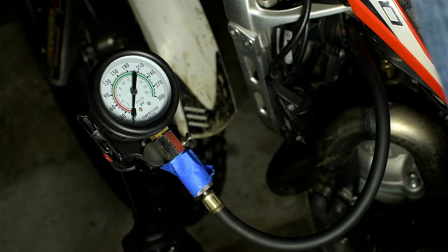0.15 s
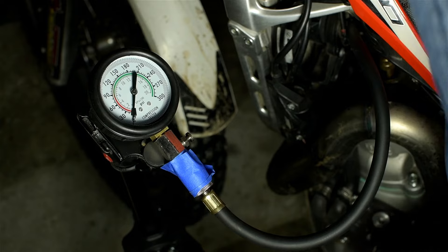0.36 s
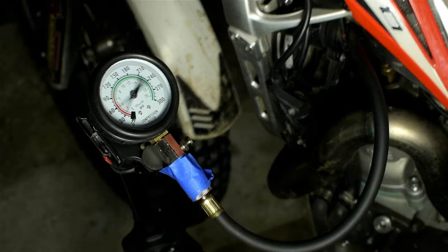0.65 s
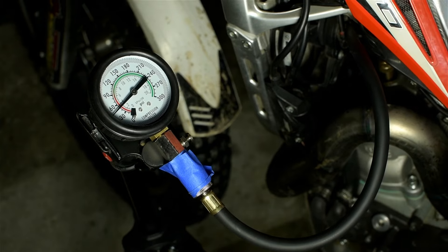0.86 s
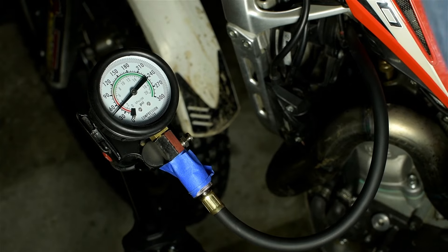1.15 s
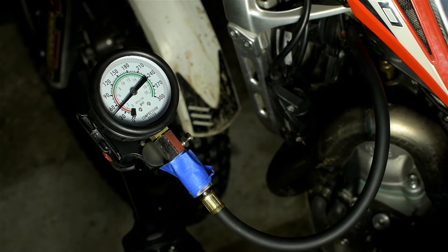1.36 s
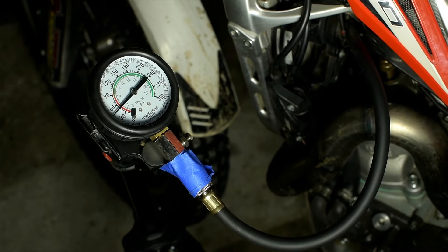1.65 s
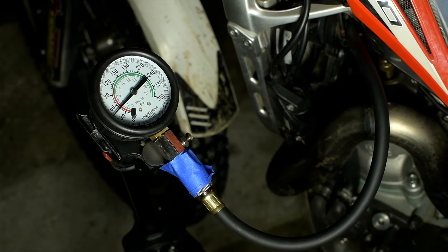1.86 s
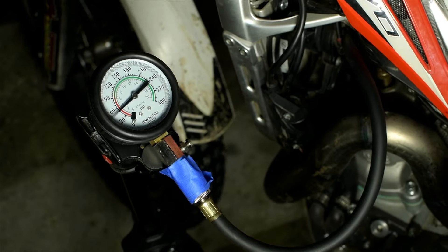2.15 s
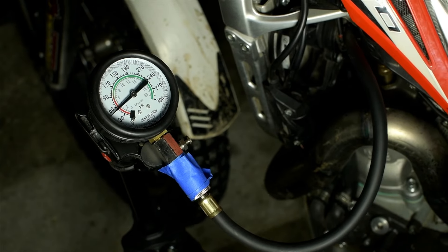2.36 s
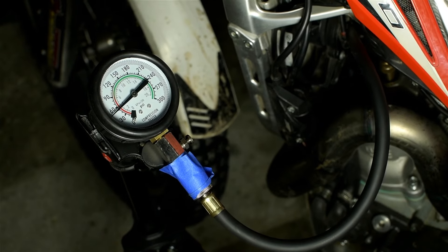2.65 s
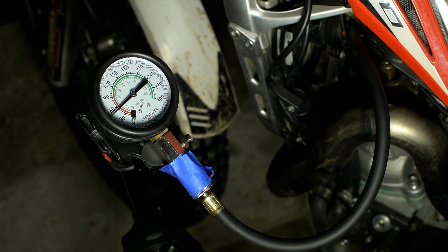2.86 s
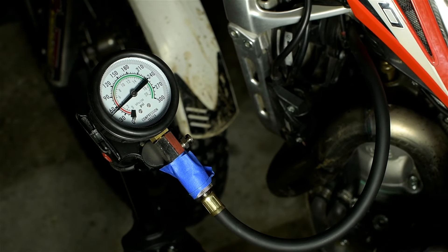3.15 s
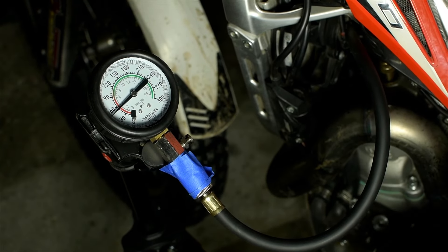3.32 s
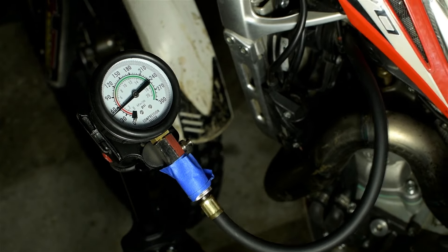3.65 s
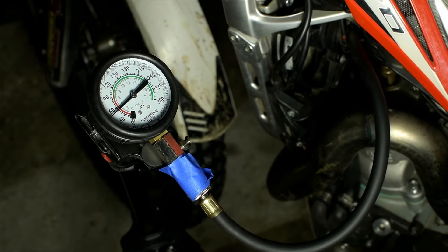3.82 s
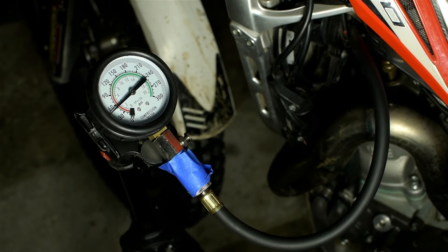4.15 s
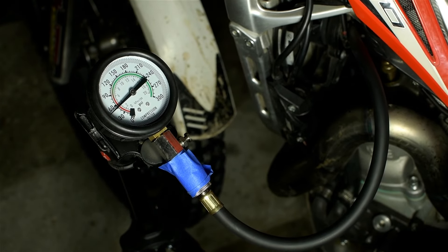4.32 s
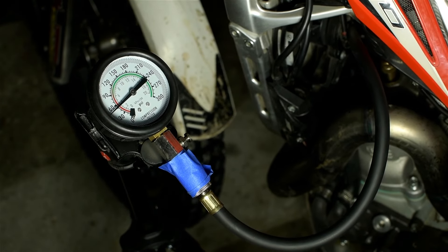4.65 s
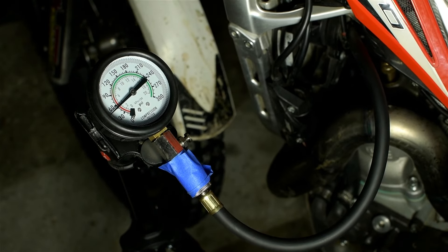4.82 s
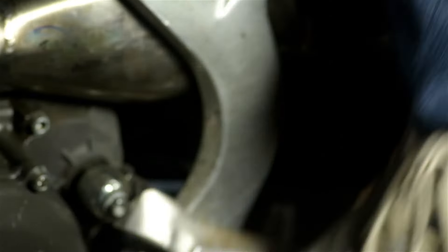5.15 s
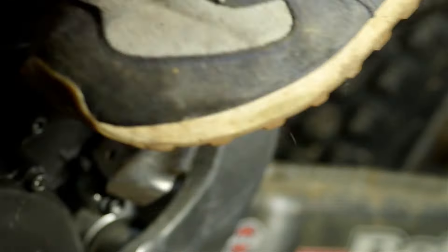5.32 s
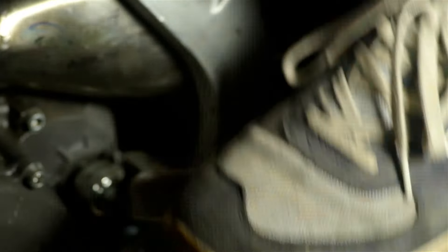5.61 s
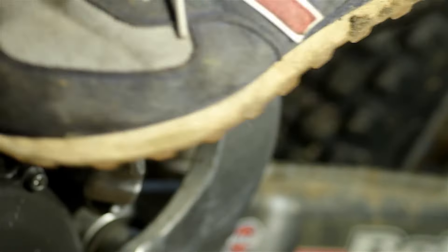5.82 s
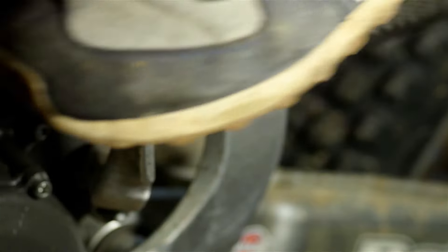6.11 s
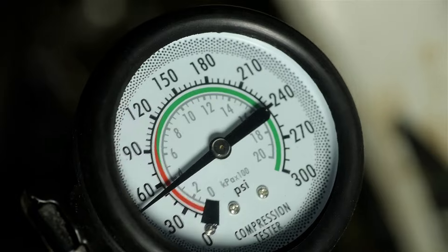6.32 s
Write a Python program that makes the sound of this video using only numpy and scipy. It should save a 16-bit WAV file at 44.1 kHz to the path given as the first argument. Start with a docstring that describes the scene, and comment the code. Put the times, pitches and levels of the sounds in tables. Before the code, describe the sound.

Close microphone on a small engine that never catches. A kick lever clacks, air chuffs from the cylinder in rapid hollow pulses that slow and soften, and starter teeth click over whirring gears; small metal taps follow as the crank rocks back. This happens three times, then four fast, compressed strokes land as wide, rasping thumps, with short garage echoes and faint air beneath.

```python
"""A small two-stroke motorcycle engine is kicked over in a garage, a pressure gauge in its plug hole, so it never fires.
Three long kicks come first: the lever clacks (noise bursts), the piston puffs ever more slowly (ringing pipe modes)
while the starter ratchet clicks (bursts and clinks) over a gear whirr (grainy noise); then the crank rocks back with
small gear taps (scrapes and short tones) and soft hoots of air (wavering sines). Four sped-up kicks follow, their
ratchet clicks blurred into a rasp (fluttering noise), with sharp ticks (bare spikes) and low tones in their thumps."""
import sys
import numpy as np
from scipy import signal
from scipy.fft import rfft, irfft
from scipy.io import wavfile
from scipy.ndimage import uniform_filter1d

SR = 44100
rng = np.random.default_rng(int(sys.argv[2]) if len(sys.argv) > 2 else 0)


def digitize_waveform(pressure):
    """Quantize a signal to 16-bit integers and store it at the path in sys.argv[1].

    Rows of a 2-D input are taken as channels; values are limited to [-1, 1].
    """
    field = np.atleast_2d(pressure).T
    bounded = np.clip(field, -1, 1)
    quanta = np.round(bounded * 32767).astype(np.int16)
    wavfile.write(sys.argv[1], SR, quanta)


N = 285621  # length in samples


def amp(db):
    """Decibels to gain."""
    return 10 ** (np.asarray(db) / 20)


def evened(x):
    """Scales to an rms of 1."""
    return x / np.sqrt(np.mean(x ** 2) + 1e-20)


def read(points, hz):
    """Reads a table on a log-frequency axis."""
    f, value = np.transpose(points)
    return np.interp(np.log(hz + 1), np.log(f + 1), value)


def seconds(length):
    """A time axis."""
    return np.arange(int(length * SR)) / SR


def add(mix, s, sound):
    """Lays a sound into the mix at time s."""
    part = mix[max(round(s * SR), 0):][:len(sound)]
    part += sound[:len(part)]


def colour(x, points, tilt_db=0, size=2048):
    """Causal filter of unit energy with the given spectrum; tilt_db an octave bends it well above 700 Hz."""
    hz = abs(np.fft.fftfreq(size, 1 / SR))
    log_gain = np.log(amp(read(points, hz) + tilt_db * np.log2(1 + hz / 700)))
    # the Hilbert transform of the log gain gives the minimum phase
    impulse = np.fft.ifft(np.exp(np.conj(signal.hilbert(log_gain)))).real
    return signal.oaconvolve(x, impulse / np.linalg.norm(impulse))[:len(x)]


# the pipe's air resonances: pitch_hz, level_db (relative), t60_s
PIPE_MODES = [(90.5, -19.5, 0.24), (113, -12.5, 0.45), (139.3, -16.5, 0.14), (171.4, -11, 0.4),
              (210.6, -2, 0.1), (241.2, 1, 0.11), (296, -15, 0.098), (333.2, -4, 0.11), (408.5, -6.5, 0.21),
              (468.8, -6.5, 0.55), (489, -2.5, 0.11), (679.5, -19.5, 0.17), (804, -17, 0.09)]
# single shoves of the piston, as a kick bites, the crank rocks back or a sped-up kick lands:
# start_s, level_db (before the trim), tilt_db_per_octave
PISTON_SHOVES = [(.591, -15, 9.5), (1.273, -29.5, -0.5), (1.525, -41.5, 1), (2.115, -21.5, 14),
                 (3.027, -30.5, -1), (3.671, -26.5, -7.5), (4.426, -31.5, -1), (4.863, -49.5, 5.5),
                 (5.154, -26, -7.5), (5.163, -25, 8), (5.556, -25, 18), (5.575, -28, -7), (5.966, -21, -3),
                 (5.995, -25.5, -4.5), (6.066, -35, -3), (6.146, -40, 0.5), (6.207, -51, -1),
                 (6.345, -21.5, 7), (6.359, -25, -2)]


def piston(trim_db=3, stagger=-1.23, opening_time=0.0035, echo_db=-6, echo_delay=.0138, rush_db=-14):
    """Each opening of the port pushes a puff into the pipe; sharper puffs favour the upper resonances."""
    out, t = np.zeros(N), seconds(.5)
    hz, mode_db, t60 = np.transpose(PIPE_MODES)[:, :, None]
    # travel along the pipe puts each resonance behind the one below, in radians
    lag = stagger * np.arange(len(PIPE_MODES))[:, None]
    opening = 1 - np.exp(-t / opening_time)
    for s, db, tilt_db in [*PISTON_SHOVES, *coasting_puffs()]:
        # the rush of air pulls the resonances off pitch, differently each time, until it has passed
        pull = 1 + .06 * rng.standard_normal(hz.shape) * np.exp(-t / .025)
        phase = 2 * np.pi * np.cumsum(hz * pull, axis=1) / SR + lag
        modes = amp(-60 * t / t60) * np.sin(phase)
        share = amp(mode_db + tilt_db * np.log2(hz / hz.mean()))
        tone = (modes * share).sum(0) / np.linalg.norm(share)
        puff = amp(db + trim_db) * opening * (tone + amp(rush_db) * rush(t))
        add(out, s, puff)
        add(out, s + echo_delay, amp(echo_db) * puff)  # thrown back by a near wall
    return out


# long kicks, levels before slowing, scatter and trims: first_turn_s, first_speed_turns_per_s, puff_level_db,
# tooth_level_db, full_whirr_s, whirr_level_db
LONG_KICKS = [(.648, 17.22, -17.8, -22.6, .635, -35), (2.158, 20.85, -18, -22.3, 2.21, -33.3),
              (3.7225, 16.62, -17.5, -23.4, 3.76, -34.5)]
FRICTION_TURNS_PER_S2 = 26.5
# slower turns, in turns per s, puff more softly and, in dB per octave, more dully
PUFF_FULL_SPEED, PUFF_DB_PER_SPEED = 18.6, 0.92
PUFF_TILT_DB, PUFF_TILT_PER_SPEED, PUFF_TILT_SCATTER_DB = -1.56, 0.2, 1.8


def coasting_puffs():
    """Friction slows the crank at one steady rate; one puff a turn: start_s, level_db, tilt_db_per_octave."""
    for start, speed, db, *_ in LONG_KICKS:
        scatter = rng.standard_normal(size=16)
        turns = int(speed ** 2 / (2 * FRICTION_TURNS_PER_S2)) + 1
        for turn in range(min(turns, len(scatter))):
            now = np.sqrt(speed ** 2 - 2 * FRICTION_TURNS_PER_S2 * turn)
            slower = PUFF_FULL_SPEED - now
            when = start + (speed - now) / FRICTION_TURNS_PER_S2
            tilt_db = PUFF_TILT_DB - PUFF_TILT_PER_SPEED * slower + PUFF_TILT_SCATTER_DB * scatter[turn]
            yield when, db - PUFF_DB_PER_SPEED * slower, tilt_db


def rush(t, low_hz=260, high_hz=423, decay=0.018):
    """A short burst of turbulent air, low in pitch."""
    band = signal.butter(2, [low_hz, high_hz], "bandpass", fs=SR)
    noise = signal.lfilter(*band, rng.standard_normal(len(t)))
    return evened(noise) * np.exp(-t / decay)


# colour of the ratchet: pitch_hz, level_db
RATCHET_COLOUR = [(150, -39.5), (500, -11.5), (750, -9.5), (1200, -3.5), (1500, -7.5), (2000, -1.5),
                  (2550, 2.5), (3100, -0.5), (3700, -6.5), (5000, -6.5), (7500, -14.5), (11000, -23.5),
                  (16000, -34)]


def ratchet(decay=0.0023, clink_db=-9, rattle_db=-13, rattle_decay=0.017, trim_db=0.5, scatter_db=1.5):
    """Each tooth snaps into the next gap with a dry clink and rattles briefly."""
    out = np.zeros(N)
    for (_, _, _, tooth_db, _, _), slip in zip(LONG_KICKS, RATCHET_SLIP):
        for s in tooth_times(slip):
            db = tooth_db + scatter_db * rng.standard_normal()
            ring = amp(clink_db) * clink(.004, count=28)
            rattle = amp(rattle_db) * chatter(rattle_decay)
            add(out, s, amp(db + trim_db) * (chatter(decay) + ring + rattle))
    return case(colour(out, RATCHET_COLOUR), ring_db=-14.5)


# speed at which the starter ratchet slips, first tooth to last, one curve for each long kick:
# time_s, slip_teeth_per_s
RATCHET_SLIP = [
    [(0.698, 49.9), (0.819, 60.0), (0.925, 39.9), (0.992, 41.5), (1.032, 25.9), (1.114, 31.2)],
    [(2.205, 55.2), (2.367, 62.5), (2.512, 39.8), (2.552, 48.8), (2.592, 31.3), (2.632, 38.9),
     (2.795, 16.0)],
    [(3.758, 54.4), (3.812, 41.7), (3.943, 53.9), (4.043, 35.8), (4.095, 37.5), (4.135, 17.2),
     (4.213, 34.1)],
]


def tooth_times(slip):
    """A tooth drops each time the ratchet has slipped one more pitch."""
    at, rate = np.transpose(slip)
    t = at[0] + seconds(at[-1] - at[0])
    passed = np.cumsum(np.interp(t, at, rate)) / SR
    return np.interp(np.arange(passed[-1]), passed, t)


def chatter(decay, rise_share=0.13):
    """Metal meeting metal: a noise burst of tiny contacts that builds fast and decays exponentially."""
    t = seconds(.15) / decay
    shape = np.exp(-t) * (1 - np.exp(-t / rise_share))
    burst = evened(shape * np.tanh(rng.standard_normal(len(t))))
    return burst * np.sqrt(np.mean(np.exp(-2 * t)))  # longer bursts carry more energy


def clink(decay, count):
    """A small steel part rings with a different handful of partials each time it is struck."""
    t = seconds(.15)
    hz = np.geomspace(1500, 14000, count)[:, None] * rng.uniform(.92, 1.08, (count, 1))
    level = np.sqrt(hz / hz.mean()) * rng.standard_normal((count, 1))
    partials = level * np.sin(2 * np.pi * (hz * t + rng.random((count, 1))))
    return evened(partials.sum(0)) * np.exp(-t / decay) * (1 - np.exp(-t / .0005))


# ringing of the crankcase: pitch_hz, level_db (relative), t60_s (held to .28 at most)
CASE_MODES = [(907.2, -11.5, 0.28), (1207, -19, 0.089), (1754, -10.5, 0.12), (1860, -15.5, 0.13),
              (2530, -22.5, .2), (2850, -59.5, .2), (3054, -17.5, 0.36), (3160, -30, 0.6),
              (4760, -11.5, 0.11)]


def case(x, ring_db):
    """The crankcase rings on briefly after whatever shakes it."""
    t = seconds(.5)
    ring = np.zeros(len(t))
    for hz, db, t60 in CASE_MODES:
        mode = amp(-60 * t / min(t60, .28)) * np.cos(2 * np.pi * hz * t)
        ring += amp(db) * evened(mode)
    return x + amp(ring_db) * signal.oaconvolve(x, ring / np.sqrt(len(t)))[:N]


# colour of the gear whirr: pitch_hz, level_db
GEAR_COLOUR = [(50, -33.5), (100, 19.5), (250, 0.5), (480, 10.5), (650, 5), (1400, 2.5), (2000, -5),
               (3000, 4), (3800, -1.5), (5200, -9), (8400, -13.5), (16000, -28)]
WHIRR_FULL_SLIP, WHIRR_DB_PER_SLIP = 58.5, 0.18  # teeth per s; dB for each tooth per s
WHIRR_RISE_S, WHIRR_HOLD_S, WHIRR_FALL_DB_PER_S = 0.055, 0.019, 116  # the fall is the body's


def gears(trim_db=-2, treble_hz=6500, treble_fall=1.8):
    """The gear train whirrs, louder with faster slip, and dies after the last tooth, treble first."""
    t, body, treble = np.arange(N) / SR, np.zeros(N), np.zeros(N)
    for (*_, full_at, whirr_db), slip in zip(LONG_KICKS, RATCHET_SLIP):
        at, rate = np.transpose(slip)
        db = whirr_db + WHIRR_DB_PER_SLIP * (np.interp(t, at, rate) - WHIRR_FULL_SLIP)
        rise = np.exp(-(np.minimum(t - full_at, 0) / WHIRR_RISE_S) ** 2)
        fall_db = WHIRR_FALL_DB_PER_S * np.maximum(t - at[-1] - WHIRR_HOLD_S, 0)
        body += rise * amp(db - fall_db)
        treble += rise * amp(db - treble_fall * fall_db)
    contacts = grains(per_s=1500, spread_db=3.5, smooth=0.64)
    low = signal.sosfiltfilt(signal.butter(4, treble_hz, fs=SR, output="sos"), contacts)
    high = contacts - low
    return case(colour(amp(trim_db) * (body * low + treble * high), GEAR_COLOUR), ring_db=-26)


def grains(per_s, spread_db, smooth):
    """Many small contacts of uneven size over smooth rubbing."""
    size = amp(spread_db * np.minimum(rng.exponential(1, N), 4))
    hits = size * (rng.random(N) < per_s / SR) * rng.choice([-1, 1], N)
    return evened(evened(hits) + smooth * rng.standard_normal(N))


# clacks of the kick lever against its gear and stop:
# start_s, level_db (before the trim), tilt_db_per_octave, decay_s
LEVER_CLACKS = [(.536, -38, 3, .011), (.554, -16.5, -1, 0.0036), (.589, -24.5, -3, 0.013),
                (1.728, -54.5, 5.5, .011), (1.966, -40, 3, 0.0055), (2.113, -30, -7, 0.023),
                (2.155, -28.5, -14.5, 0.045), (3.144, -31.5, -3.5, 0.0042), (3.577, -37.5, -9, 0.0059),
                (3.625, -49, -10.5, 0.05), (3.652, -33, -10.5, 0.055), (3.734, -24, -6.5, 0.011),
                (4.232, -32.5, 3.5, 0.012), (4.797, -50, 2, 0.02), (4.86, -40.5, -5.5, 0.0069),
                (5.12, -60, 7, .0048), (5.152, -23.5, -9.5, 0.0077), (5.538, -52, 0.5, 0.011),
                (5.557, -27.5, -9.5, 0.0078), (5.576, -32, -9, 0.003), (5.737, -32, -5.5, 0.0034),
                (5.944, -46, -2, .012), (5.955, -27.5, -9, 0.01), (6.151, -36, -1, 0.0041),
                (6.319, -40, -15.5, 0.016), (6.344, -26.5, -8.5, 0.013)]
# colour of the lever, also worn by the loose parts: pitch_hz, level_db
LEVER_COLOUR = [(50, -19.5), (150, -10), (450, -2.5), (800, -0.5), (1300, -3.5), (2500, 5), (3500, -5),
                (6000, -10.5), (10000, -17), (16000, -34)]


def lever(trim_db=1, top_hz=14000):
    """The kick lever takes up its slack, bottoms out and swings back; gentler contacts are duller."""
    out, hardest_db = np.zeros(N), max(row[1] for row in LEVER_CLACKS)
    for s, db, tilt_db, decay in LEVER_CLACKS:
        edge_hz = np.clip(top_hz * amp((db - hardest_db) / 4), 1000, 18000)
        contact = signal.lfilter(*signal.butter(4, edge_hz, fs=SR), chatter(decay, rise_share=0.56))
        add(out, s, amp(db + trim_db) * colour(contact, LEVER_COLOUR, tilt_db))
    return case(out, ring_db=-27.5)


# sped-up kicks: start_s, end_s, level_db (before the sag), stereo_width_db
SPED_UP_KICKS = [(5.145, 5.29, -33, -3.5), (5.553, 5.701, -31.5, -6), (5.963, 6.083, -30, -30),
                 (6.333, 6.489, -33.5, -2.5)]
# colour of the rasp: pitch_hz, level_db
RASP_COLOUR = [(60, -31.5), (130, 0.5), (450, -10.5), (700, -16.5), (900, -3.5), (1400, -8.5), (1800, -6),
               (2400, -3), (3000, -0.5), (3800, -9), (5000, -11.5), (7000, -17), (16000, -36.5)]


def rasp(rise=0.034, release=0.017, sag_db=-18, flutter_db=1.7):
    """The sped-up ratchet clicks blur into an uneven rasp that sags by sag_db a second, then dies away."""
    t, level = np.arange(N) / SR, np.zeros(N)
    for start, end, db, _ in SPED_UP_KICKS:
        gate = np.clip((t - start) / rise, 0, 1) * np.exp(-np.maximum(t - end, 0) / release)
        level += gate * amp(db + sag_db * np.clip(t - start, 0, 1))
    flutter = amp(flutter_db * evened(uniform_filter1d(rng.standard_normal(N), size=220)))  # 5 ms average
    return case(colour(level * flutter * rng.standard_normal(N), RASP_COLOUR), ring_db=-20.5)


# sharp dry ticks in the sped-up kicks: start_s, level_db (at the peak)
DRY_TICKS = [(5.164, -13.5), (5.2067, -27), (5.58, -12.5), (5.998, -13.5)]


def ticks():
    """Single rounded spikes with no ring."""
    out, t = np.zeros(N), seconds(.01) / .000075  # the peak comes after 75 microseconds
    for s, db in DRY_TICKS:
        add(out, s, amp(db) * t * np.exp(1 - t))
    return out


# taps of slack gears as the crank rocks: start_s, level_db, ring_pitch_hz
GEAR_TAPS = [(.492, -46, 900), (1.237, -37, 1950), (1.309, -39.5, 2480), (1.479, -42, 2430),
             (1.631, -51, 2610), (2.985, -42, 1905), (3.026, -46, 2460), (3.088, -48.5, 2410),
             (3.303, -44.5, 2424), (3.578, -38, 2220), (4.389, -39, 1840), (4.464, -42.5, 2420),
             (4.486, -49, 2480), (4.694, -42.5, 2410), (5.032, -51, 2570), (5.356, -46, 2500),
             (5.416, -50.5, 2590), (5.808, -49, 1860)]
# colour of the tap's scrape: pitch_hz, level_db
TAP_COLOUR = [(150, -35.5), (600, 1), (1000, 2.5), (1450, -2), (1900, -6), (2150, 1), (2480, 6.5),
              (2950, -12.5), (4000, -19.5), (6000, -50.5), (12000, -69)]


def taps(decay=0.003, ring_time=0.002):
    """Gear flanks knock together as the crank changes direction: a scrape and one short ring."""
    scrapes, rings, t = np.zeros(N), np.zeros(N), seconds(.5)
    swell = t / ring_time * np.exp(1 - t / ring_time)
    for s, db, hz in [*GEAR_TAPS, *settling_taps()]:
        add(scrapes, s, amp(db) * chatter(decay))
        add(rings, s, amp(db) * swell * np.sin(2 * np.pi * hz * t))
    return case(colour(scrapes, TAP_COLOUR), ring_db=-7.0) + rings


SETTLE_DB, SETTLE_FALL_DB_PER_S = -50, 71.5  # level at the stop, and its fall from there
SETTLE_FROM_S, SETTLE_UNTIL_S = .04, 0.24  # after the stop
SETTLE_LOW_HZ, SETTLE_HIGH_HZ = 1700, 3890


def settling_taps(count=4):
    """A few faint, dying taps whenever the crank comes to rest: start_s, level_db, ring_pitch_hz."""
    stops = [start + speed / FRICTION_TURNS_PER_S2 for start, speed, *_ in LONG_KICKS]
    stops += [end for _, end, *_ in SPED_UP_KICKS]
    for stop in stops:
        for when, pitch in rng.random((count, 2)):
            wait = SETTLE_FROM_S + when * (SETTLE_UNTIL_S - SETTLE_FROM_S)
            hz = SETTLE_LOW_HZ + pitch * (SETTLE_HIGH_HZ - SETTLE_LOW_HZ)
            yield stop + wait, SETTLE_DB - SETTLE_FALL_DB_PER_S * wait, hz


# soft hoots of air, and short low tones that give body to the sped-up kicks' thumps:
# loudest_s, level_db (before the trim), swell_s, pitch_hz (at the loudest, before the waver)
HOOTS_AND_THUMPS = [(.613, -32, .02, 500), (1.415, -40, .022, 497), (2.138, -28, 0.021, 500),
                    (2.921, -45, 0.037, 495), (3.224, -40.5, 0.027, 505), (4.617, -39.5, 0.026, 497),
                    (4.726, -52.5, .013, 500), (5.167, -22.5, 0.0076, 480), (5.562, -35, 0.0049, 470),
                    (6.359, -29, .01, 470)]


def hoots(trim_db=2, bend=0.015, fade_share=.68):
    """A soft, unsteady tone whose pitch lifts as it swells; it fades faster than it swells."""
    t, out = np.arange(N) / SR, np.zeros(N)
    waver = .03 * evened(uniform_filter1d(rng.standard_normal(N), size=200))
    for s, db, swell, hz in HOOTS_AND_THUMPS:
        width = np.where(t < s, swell, fade_share * swell)
        flow = np.exp(-.5 * ((t - s) / width) ** 2)
        pitch = hz * (1 + bend * (flow - 1) + waver)
        out += amp(db + trim_db) * flow * np.sin(2 * np.pi * np.cumsum(pitch) / SR)
    return out


def loose_parts(motion, settle=0.021, level_db=-17):
    """Loose fittings rattle as hard as the engine has just shaken them."""
    keep = np.exp(-1 / (settle * SR))
    shake = np.sqrt(signal.lfilter([1 - keep], [1, -keep], motion ** 2))
    contacts = grains(per_s=110, spread_db=3, smooth=0)
    rattle = signal.oaconvolve(contacts, chatter(0.0029))[:N]
    return amp(level_db) * shake * evened(colour(rattle, LEVER_COLOUR))


# decay of the garage: pitch_hz, t60_s (before the length scaling)
GARAGE_DECAY = [(100, 0.46), (500, 0.75), (1000, 0.52), (2500, 0.29), (5000, 0.49), (9000, 0.2),
                (16000, 0.14)]


def garage(x, length=1, gap=0.0028, count=12):
    """Sparse echoes of random sign, each band dying at its own speed; length scales the decay times."""
    echoes = np.zeros(SR)
    at = np.arange(0, SR - count, count)
    echoes[at + rng.integers(0, count, len(at))] = rng.choice([-1., 1.], len(at))
    hz, t, bands = signal.stft(echoes, SR, nperseg=256)
    t60 = length * read(GARAGE_DECAY, hz)[:, None]
    tail = signal.istft(bands * amp(-60 * t / t60), SR, nperseg=256)[1]
    tail *= np.clip(np.arange(len(tail)) / SR / gap - 1, 0, 1)  # silent for one gap, full after two
    return signal.fftconvolve(x, tail / np.linalg.norm(tail))[:N]


SPED_UP_FROM_S = 5.1  # the sped-up kicks begin after this


def spread(x, scatter_time=0.0022, treble_db=-7, treble_hz=4500):
    """Side signal: the long kicks are central; the sped-up kicks sound wide and phasey, the treble most."""
    t, width = np.arange(N) / SR, np.zeros(N)
    for start, _, _, width_db in SPED_UP_KICKS:
        width[t > start - .05] = amp(width_db)
    lag = seconds(.02)
    paths = rng.standard_normal(len(lag)) * np.exp(-lag / scatter_time)
    quarter_turns = 1j * np.tanh(2 * evened(rfft(paths).real))  # each band leads or lags at random
    scatter = np.fft.fftshift(irfft(quarter_turns, len(lag)))
    scattered = signal.oaconvolve(x, scatter)[len(lag) // 2:][:N]
    treble = signal.lfilter(*signal.butter(2, treble_hz, "highpass", fs=SR), scattered)
    return width * scattered + amp(treble_db) * (t > SPED_UP_FROM_S) * treble


# colour of the background air: pitch_hz, level_db
AIR_COLOUR = [(18, -78.5), (30, -28), (118, -3), (2980, -15), (3670, -13), (3980, -12.5), (4420, -19),
              (10500, -20), (16000, -35)]


def background_air(level_db):
    """Faint, steady coloured noise under everything."""
    return amp(level_db) * colour(rng.standard_normal(N), AIR_COLOUR)


def scene():
    """The engine is close; the echo tail is shortened in the sped-up kicks, along with everything else."""
    sped_up = np.arange(N) / SR > SPED_UP_FROM_S
    air, coasting, rasping, hoot = piston(), ratchet() + gears(), rasp(), hoots()
    blows = lever() + taps() + loose_parts(coasting + rasping)
    send = amp(-7.5) * coasting + amp(-25.5) * rasping + amp(-6) * blows
    send += amp(-12.5) * air + amp(-17) * hoot
    echoes = garage(send * ~sped_up) + garage(send * sped_up, length=0.55)
    engine = coasting + rasping + blows + air + hoot + ticks() + echoes
    mid = engine + background_air(-81)
    side = spread(engine) + background_air(-87)
    return np.array([mid + side, mid - side])


def record(dry):
    """The microphone's bass cut at 76 Hz and the band limit at 16050 Hz."""
    thinned = signal.sosfilt(signal.butter(5, 76, "highpass", fs=SR, output="sos"), dry)
    band_limit = signal.firwin(511, 16050, window=("kaiser", 9), fs=SR)
    return signal.oaconvolve(thinned, band_limit[None], "same")


dry = scene()
out = record(dry)
digitize_waveform(out)
```